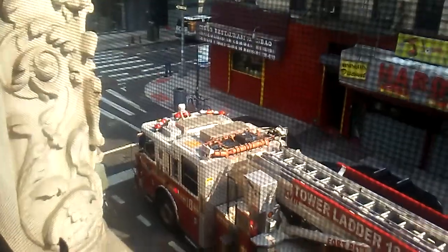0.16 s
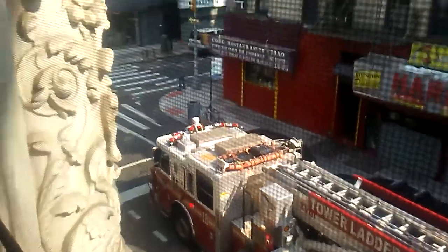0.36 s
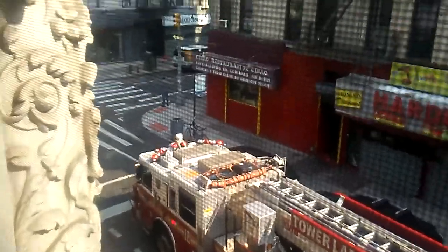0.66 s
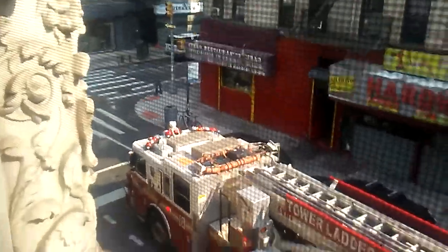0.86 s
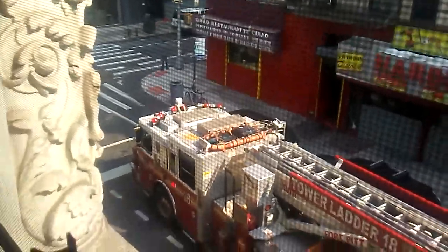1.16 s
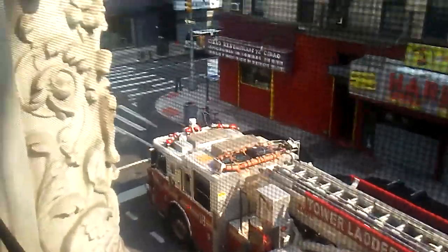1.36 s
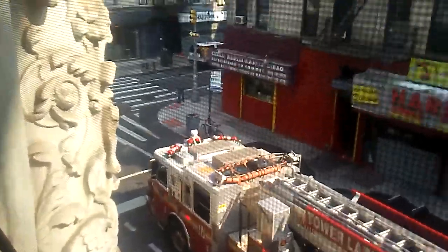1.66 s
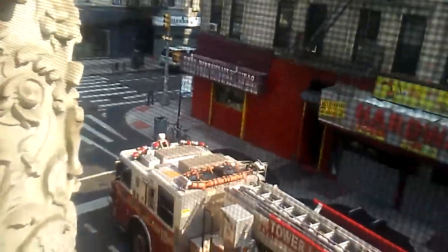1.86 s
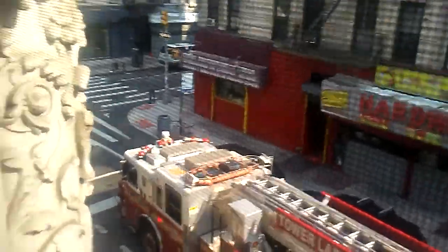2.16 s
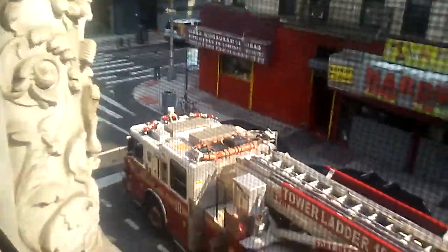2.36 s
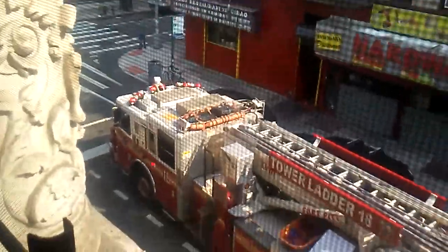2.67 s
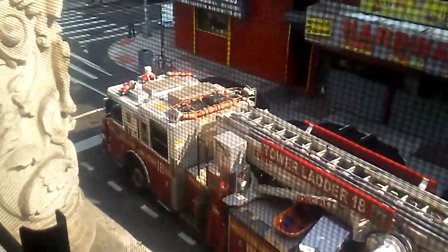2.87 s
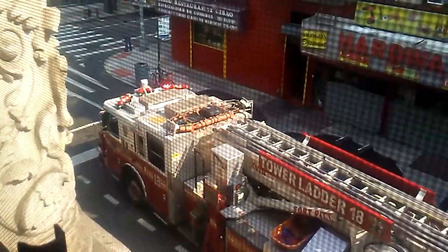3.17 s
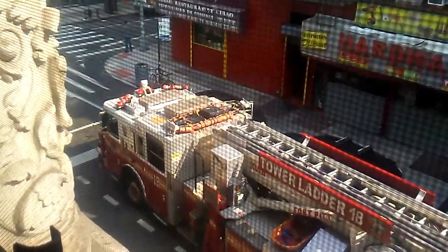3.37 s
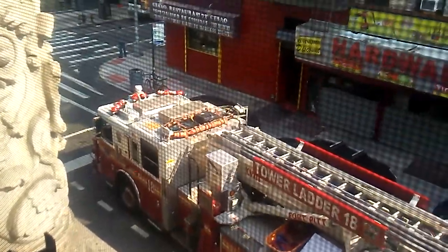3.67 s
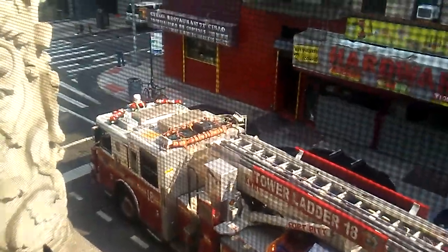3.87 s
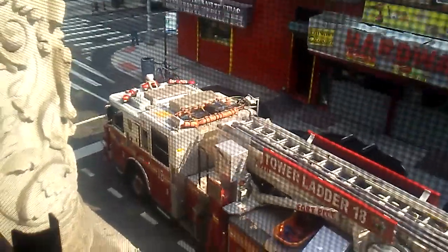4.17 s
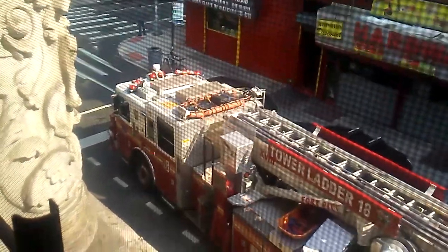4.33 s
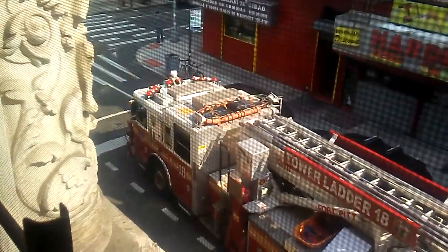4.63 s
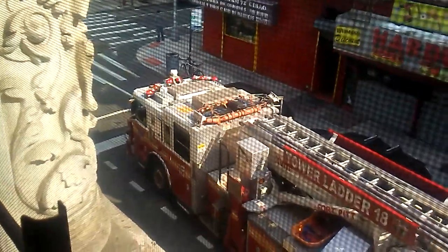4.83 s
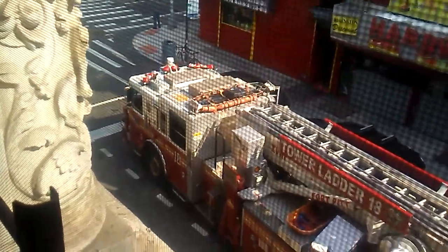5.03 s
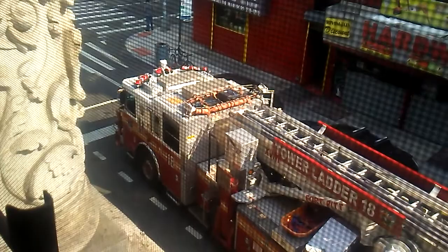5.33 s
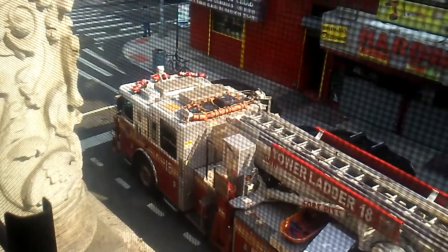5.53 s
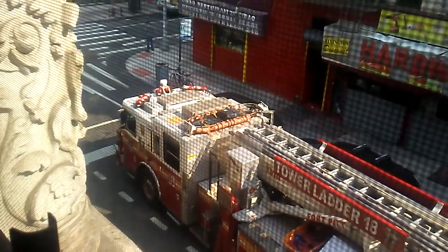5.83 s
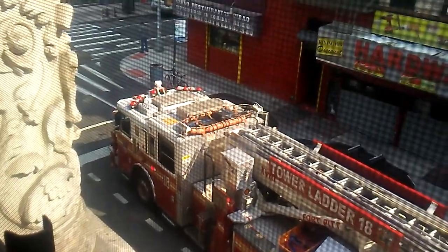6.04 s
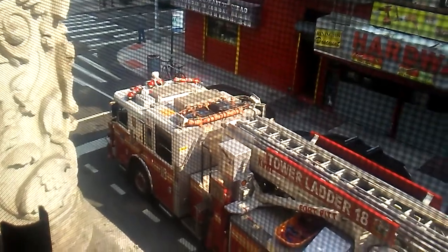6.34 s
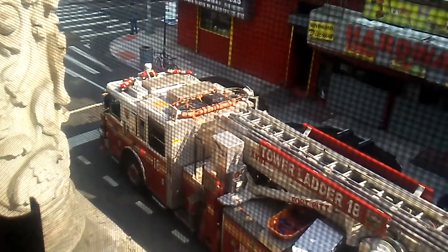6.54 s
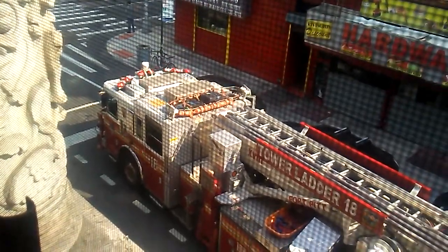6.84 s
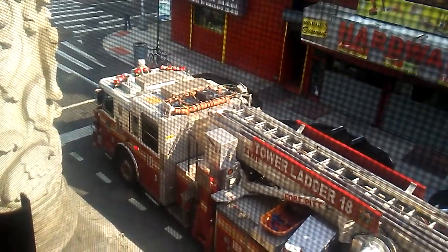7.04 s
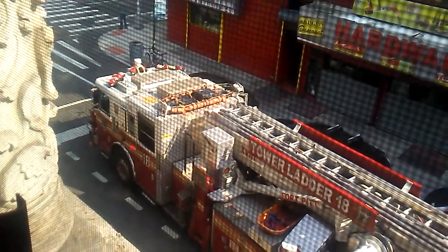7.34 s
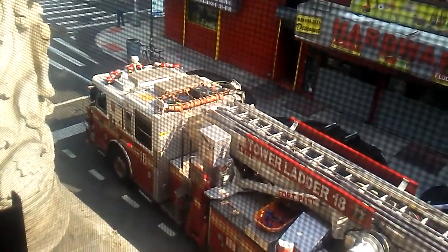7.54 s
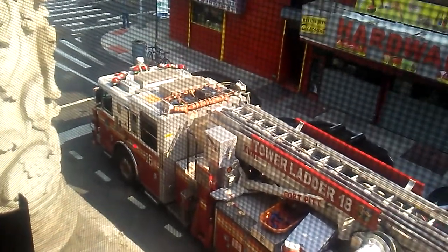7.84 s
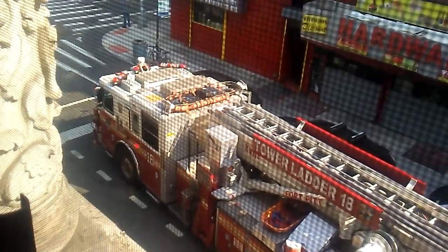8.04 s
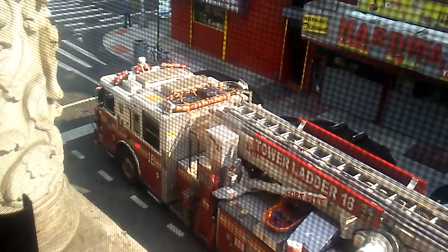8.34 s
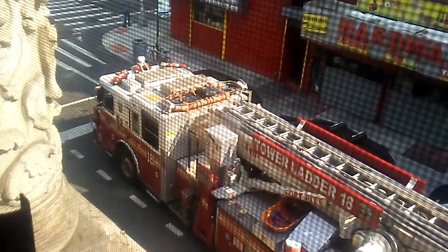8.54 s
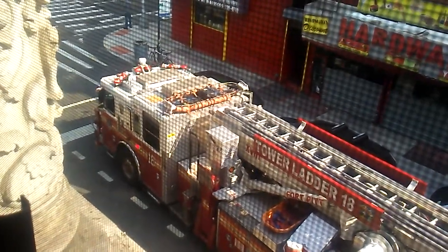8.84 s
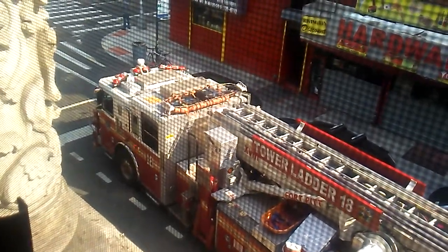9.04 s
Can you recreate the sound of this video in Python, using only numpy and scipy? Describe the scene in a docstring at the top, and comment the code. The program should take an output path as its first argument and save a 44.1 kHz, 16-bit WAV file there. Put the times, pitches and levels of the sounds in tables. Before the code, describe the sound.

Heavy truck engine idling continuously, its hum sagging and recovering slightly, with another engine throbbing and clattering softly behind it. Air valves vent: a tiny clicked puff, then a sudden overpowering rush of bright air that fades over a second or so, later a brief medium hiss and a weak last one. Heard from above through a small single microphone, amid low street rumble and faint reflections from house fronts.

```python
"""A large diesel truck idles in a city street, heard from an upper window through one small microphone.
Its speed sags and recovers, moving a gear hum, the roar and the tick of each firing, all on one crankshaft.
Air valves vent one big blast, three lesser hisses and a short puff, as coloured noise shaped by valve flow.
A second engine idles steadily nearby on multiples of its cycle; low gliding notes swell and go as sines.
House fronts scatter weak echoes, and the microphone is nearly deaf from about 4.4 to 4.8 kHz."""
import sys
import numpy as np
from scipy import signal
from scipy.fft import rfft, irfft, next_fast_len
from scipy.io import wavfile
from scipy.ndimage import uniform_filter1d, map_coordinates

SR = 44100
rng = np.random.default_rng(int(sys.argv[2]) if len(sys.argv) > 2 else 0)


def inscribe(sig):
    """Save sig as 16-bit PCM at rate SR to the path in sys.argv[1].

    A 1-D sig is mono; a 2-D sig holds one channel per row.
    Samples are clipped to [-1, 1] before scaling.
    """
    pcm = np.round(np.clip(np.atleast_2d(sig).T, -1, 1) * 32767)
    wavfile.write(sys.argv[1], SR, pcm.astype(np.int16))


N = 405705
TIME = np.arange(N) / SR  # seconds

# Engine speed of the truck, as the pitch of its gear hum. Each row: time in seconds, pitch in Hz.
GEAR_PITCH = [(0.0, 231.2), (0.5, 236.3), (1.25, 233.9), (2.25, 242.8), (2.8, 237), (3.0, 238.6),
              (3.25, 245.3), (3.85, 257.6), (4.0, 258.8), (4.4, 245.7), (4.8, 238.2), (5.35, 229.6),
              (6.1, 228.8), (6.8, 230.2), (7.4, 236.5), (7.8, 237.2), (8.4, 235.9), (9.2, 236.3)]
GEAR_ORDER = 20.045  # hum turns per crankshaft turn
FIRING_LEAD = 0.17  # head start in firings
# The casing resonance makes the hum loudest near this pitch.
CASING_HZ, CASING_WIDTH_HZ, HUM_DB = 238.5, 10.6, -34.5
# Exhaust note. Each row: multiple of the crankshaft speed, level in dB.
EXHAUST_ORDERS = [(12, -58)]
# A pair of hums that follows the engine speed, lower then upper. Each row: level on joining in dB,
# drift in dB per second.
PAIR_LEVELS = [(-35, 0), (-34, -2.4)]
# Pitch of the lower and the upper of the pair, as multiples of the gear hum.
PAIR_PITCHES = 1.0415, 1.156
PAIR_JOINS_S, PAIR_RISE_S = 5.65, 0.35


def truck_hums(gear, gear_hz, crank):
    """Gear teeth hum through a resonant casing, with an exhaust note and a later pair of hums."""
    resonance = 1 / (1 + ((gear_hz - CASING_HZ) / CASING_WIDTH_HZ) ** 2) ** 1.4
    hums = amp(HUM_DB) * resonance * tone(gear, waver_db=0.55)
    for order, db in EXHAUST_ORDERS:
        hums += amp(db) * tone(order * crank, waver_db=4.5)
    since = np.maximum(TIME - PAIR_JOINS_S, 0)
    joining = np.minimum(since / PAIR_RISE_S, 1)
    for ratio, (db, drift) in zip(PAIR_PITCHES, PAIR_LEVELS):
        hums += joining * amp(db + drift * since) * tone(ratio * gear, waver_db=1.8)
    return hums


# Engine block, fan and street. Each row: time in seconds, level in dB, extra brightness in dB.
ROAR_LEVEL = [(0, -24, .5), (1.92, -23.5, -1.5), (2.36, -25, .5), (3, -22, -0.5), (3.6, -24.5, 0.5),
              (7.15, -25, -1.5), (7.71, -24.5, -1.5), (9.2, -24.5, -2)]
# Spectrum of the roar, also used for the second engine's clatter. Each row: frequency in Hz, relative dB.
ROAR_SPECTRUM = [(160, -33), (280, -7), (350, -5.5), (470, -4), (670, -3.5), (890, -1), (1130, -5.5),
                 (1900, -5.5), (2850, -6), (3050, -11), (3600, -9.5), (4000, -13.5), (5500, -23),
                 (7000, -70)]
# Ringing bodywork, in the same two sounds. Each row: frequency in Hz, width in Hz, gain in dB.
BODY_PANELS = [(590, 21, 3.5), (630, 25, -1), (772, 62, 3), (889, 50, 3), (1044, 48, 2), (1230, 43, 2),
               (1544, 47, 3.5), (1733, 87, 5), (2260, 78, 3), (2605, 33, 3.5), (2770, 46, 4), (2954, 50, 4),
               (3730, 53, 1)]


def truck_roar(firing):
    """Broad noise rings the bodywork, swells gently with each firing and echoes off the house fronts."""
    level_db, bright_db = curves(ROAR_LEVEL)
    roar = unit(beats(firing, depth=0.12, sharp=5.9) * noise(ROAR_SPECTRUM, 0.28, BODY_PANELS))
    treble = filtered(roar, lambda hz: np.clip((hz - 1800) / 1500, 0, 1))
    roar = roar + (amp(bright_db) - 1) * treble
    return amp(level_db) * street(roar)


# Valve-gear tick. Each row: time in seconds, level in dB before dips and flutter.
TICK_LEVEL = [(0, -38.5), (.9, -38.5), (1.2, -39), (1.75, -38), (2.1, -40.5), (2.55, -38), (4.4, -45.5),
              (5.3, -45), (6.3, -43.5), (6.6, -49), (7.25, -45), (8.4, -48), (9.2, -47)]
# Spectrum of the tick. Each row: frequency in Hz, relative dB.
TICK_SPECTRUM = [(3500, -42), (4700, -3), (6370, 1), (7090, 1), (8680, -6.5), (10000, -17), (11000, -25),
                 (12000, -28), (13100, -30), (14400, -28), (15200, -37), (16500, -46)]
# Brief dips in the treble level, each ending in a quick return. Each row: start of the return in seconds,
# depth in dB.
TREBLE_DIPS = [(1.16, -2), (1.44, -2), (4.44, -9), (4.61, -3.5), (4.89, -8), (5.13, -3.5), (6.22, -6),
               (6.82, -2), (6.99, -1), (8.66, -3), (8.93, -2), (9.17, -3)]
DIP_LEAD_S, RETURN_S, TICK_FLUTTER_DB = 0.11, 0.022, 0.86
# Small steel parts. Each row: frequency in Hz, width in Hz, level in dB before their common fade.
STEEL_RINGS = [(8440, 60, -65), (10490, 70, -73), (11600, 90, -76), (12430, 80, -80)]
RING_DB, RING_DRIFT = 2.5, -0.9  # common offset in dB at the start, drift in dB per second


def truck_tick(firing):
    """Each firing sounds a bright valve-gear tick and rings a few small steel parts."""
    dips_db = sum(np.interp(TIME - s, [-DIP_LEAD_S, -RETURN_S, 0, RETURN_S], [0, depth, depth, 0])
                  for s, depth in TREBLE_DIPS)
    level_db, = curves(TICK_LEVEL)
    steel = amp(level_db + dips_db + TICK_FLUTTER_DB * wobble(9)) * noise(TICK_SPECTRUM, 1.3)

    def bells(hz):
        # scaled so that each narrow band has its listed rms level
        return sum(amp(db) * np.sqrt(SR / np.sqrt(np.pi) / width) * np.exp(-2 * ((hz - centre) / width) ** 2)
                   for centre, width, db in STEEL_RINGS)

    # the rings come and go together
    fade = amp(RING_DB + RING_DRIFT * TIME + dips_db + 3.5 * wobble(4))
    steel = steel + fade * filtered(rng.standard_normal(N), bells)
    return unit(beats(firing, depth=0.36, sharp=5.6)) * steel


def truck():
    """Six cylinders fire three times per crankshaft turn; hums, roar and tick are tied to that shaft."""
    gear_hz, = curves(GEAR_PITCH)
    gear = np.cumsum(gear_hz) / SR
    crank = gear / GEAR_ORDER
    firing = 3 * crank + FIRING_LEAD
    return truck_hums(gear, gear_hz, crank) + truck_roar(firing) + truck_tick(firing)


# Air releases; a release with several stages takes several rows, and the big blast has a leak, a burst and
# a duller plateau. Each row: opening in seconds, rise in seconds, time held open in seconds,
# jet level in dB at the end of the rise, drift while open in dB per second,
# initial fall after closing in dB per second, thin top level in dB, chest level in dB.
AIR_RELEASES = [(.535, 0.028, 0.28, -41.5, -8, -45, -43, -54), (1.785, 0.015, .04, -36, -40, -80, -55, -31),
                (2.577, 0.011, 0.081, -43, -10, -200, -48, -47),
                (2.712, .05, 0.6, -10.5, -6.5, -22, -15.5, -16.5),
                (3.3, 0.29, 0.26, -19, -1.5, -40, -33, -28.5), (5.44, 0.058, 0.11, -33, 30, -200, -42, -48),
                (5.54, 0.045, 0.13, -23.5, -19, -84, -34.5, -26.5),
                (7.42, 0.063, 0.23, -39.5, 22, -25, -45, -38), (7.7, .1, .36, -37, -4, -77, -42, -37)]
THIN_SLOPE, CHEST_SLOPE = 1.21, 1.1  # dB that these bands move for each dB of the jet
# Spectrum of the jet. Each row: frequency in Hz, relative dB.
JET_SPECTRUM = [(3800, -40), (4700, 2), (5800, 2), (6800, 2), (7500, 2.5), (8500, 2), (9500, -5),
                (10800, -20), (14000, -33), (22000, -120)]
# Spectrum of the thin top. Each row: frequency in Hz, relative dB.
THIN_SPECTRUM = [(6000, -19), (10200, 4), (11900, -2), (14500, 5), (15000, -2), (15800, -0.5)]
# Spectrum of the chest. Each row: frequency in Hz, relative dB.
CHEST_SPECTRUM = [(160, -38), (280, -7.5), (450, -3), (600, -1.5), (720, -6), (900, -3), (1400, -0.5),
                  (2400, -2.5), (3000, 1.5), (3800, 3.5), (4700, -4), (5500, -38)]
# Exhaust port resonance in the chest. Each row: frequency in Hz, width in Hz, gain in dB.
PORT_RESONANCE = [(597, 51, 4)]
# A faint narrow-band sizzle swells and fades around 1.4 s. The one row: start in seconds, rise in seconds,
# hold in seconds (negative: the fall cuts in early), level in dB, drift (with a negative hold, a fixed
# offset), initial fall in dB per second.
SIZZLE = (1.2, 0.6, -0.4, -52, -14, -70)
# Spectrum of the sizzle. Each row: frequency in Hz, relative dB.
SIZZLE_SPECTRUM = [(12500, -40), (13500, -10), (13900, 0), (14300, -4), (14900, -1), (15700, -10)]


def vents():
    """Escaping air: a jet band, a thin top from small openings, and a chest; the last two move more steeply."""
    jet_air = noise(JET_SPECTRUM, 1.0)
    thin_air = noise(THIN_SPECTRUM, 0.95)
    chest_air = noise(CHEST_SPECTRUM, 1.0, PORT_RESONANCE)
    bands = np.array([jet_air, thin_air, chest_air])
    slopes = np.array([[1], [THIN_SLOPE], [CHEST_SLOPE]])
    power = np.zeros((3, N))
    for s, rise, held, jet, drift, fall, thin, chest in AIR_RELEASES:
        levels_db = np.array([[jet], [thin], [chest]])
        power += amp(levels_db + slopes * valve(s, rise, held, drift, fall)) ** 2
    air = np.sum(np.sqrt(power) * bands, axis=0)
    s, rise, held, db, drift, fall = SIZZLE
    air += amp(db + valve(s, rise, held, drift, fall)) * noise(SIZZLE_SPECTRUM, 0.8)
    turbulence = amp(0.48 * wobble(25))
    return air * turbulence


RISE_FROM_DB, FALL_QUICKENS = -24, 1.1  # level at the opening; the fall steepens by this share per second


def valve(opens, rise, held, drift, fall):
    """Flow in dB: a rise to 0, a drift while the valve is open, a fall as the line empties."""
    t = TIME - opens - rise
    after = np.maximum(t - held, 0)
    rising = RISE_FROM_DB * np.minimum(t / rise, 0) ** 2
    falling = fall * after * (1 + FALL_QUICKENS * after)
    return rising + drift * np.clip(t, 0, held) + falling


# A short bright click as a valve opens. Each row: start in seconds, starting level in dB before the
# treble filter.
VALVE_CLICKS = [(1.797, -43)]


def clicks():
    """A bright crack of a few milliseconds: noise dying away, with only its treble kept."""
    out = np.zeros(N)
    t = np.arange(SR // 50) / SR
    for s, db in VALVE_CLICKS:
        out[round(s * SR):][:len(t)] += amp(db - 60 * t / 0.03) * rng.standard_normal(len(t))
    return filtered(out, lambda hz: np.clip((hz - 5500) / 4000, 0, 1))


# Second engine, nearby. Each row: time in seconds, main throb in dB, upper throb in dB.
STEADY_LEVEL = [(0, -54, -55), (1, -48.5, -55), (2.4, -50, -55), (2.8, -53.5, -54), (3.6, -46, -62),
                (4, -57, -61), (4.4, -49, -57), (5.2, -54.5, -66), (6.4, -57, -61), (6.8, -51.5, -63),
                (7.5, -56, -48), (8, -48.5, -49), (9.2, -52, -49)]
STEADY_CYCLE_HZ = 5.846
# Notes of the main throb. Each row: multiple of the cycle, dB relative to the throb.
MAIN_ORDERS = [(9, -14), (12, 1), (18, -12), (37, 1.5)]
# Notes of the upper throb. Each row: multiple of the cycle, dB relative to the throb.
UPPER_ORDERS = [(13, -2), (14, -1.5)]
# Spectrum of the street rumble. Each row: frequency in Hz, relative dB.
RUMBLE_SPECTRUM = [(25, -46), (45, -41), (60, -28), (95, -17), (122, -36), (150, -16.5), (200, -10),
                   (280, -6), (330, -38), (400, -67)]


def neighbour():
    """A steady engine throbs on low multiples of its cycle and clatters, over street rumble."""
    main_db, upper_db = curves(STEADY_LEVEL)
    cycle = STEADY_CYCLE_HZ * TIME
    main = sum(amp(db) * tone(k * cycle, waver_db=0.3) for k, db in MAIN_ORDERS)
    upper = sum(amp(db) * tone(k * cycle, waver_db=3.5) for k, db in UPPER_ORDERS)
    # the same knocks return every cycle, very slightly early or late
    pattern = rng.standard_normal(round(SR / STEADY_CYCLE_HZ))
    place = (cycle + 0.00059 * wobble(1.522)) % 1
    knocks = map_coordinates(pattern, [place * len(pattern)], mode="wrap")
    clatter = amp(-33.5) * coloured(knocks, ROAR_SPECTRUM, BODY_PANELS)
    rumble = amp(-39.5) * noise(RUMBLE_SPECTRUM, 0.85)
    return clatter + amp(main_db) * main + amp(upper_db) * upper + rumble


# Low notes that swell and go. Each row: start in seconds, length in seconds, starting pitch in Hz,
# glide in Hz per second, peak level in dB.
LOW_NOTES = [(3.2, .95, 271, 9, -46), (5.1, 2.2, 172, .3, -53), (7, 1.05, 75, 6.5, -48),
             (7.6, 2, 147.5, 2.2, -50)]


def drones():
    """Low notes that swell and go, each a gliding sine under one soft arch."""
    out = np.zeros(N)
    for s, length, hz, glide, db in LOW_NOTES:
        t = np.clip(TIME - s, 0, length)
        arch = np.sqrt(np.abs(np.sin(np.pi * t / length)))
        out += arch * amp(db) * tone(np.cumsum(hz + glide * t) / SR, waver_db=0.0)
    return out


def street(x):
    """House fronts return 40 weak scattered echoes within a tenth of a second, later ones weaker."""
    echoes = np.zeros(SR // 10)
    lag, size = rng.random((2, 40))
    echoes[(lag * len(echoes)).astype(int)] = amp(-21 - 8.4 * lag) * np.sign(size - 0.5)
    echoes[0] = 1  # direct sound
    return signal.fftconvolve(x, echoes / np.linalg.norm(echoes))[:N]


def tone(turns, waver_db):
    """A sine of rms about 1 on a running count of turns, slightly unsteady in level if waver_db is set."""
    return np.sqrt(2) * amp(waver_db * wobble(6)) * np.sin(2 * np.pi * (turns + rng.random()))


def beats(turns, depth, sharp):
    """One swell per turn, sudden rise and slower fall, each at its own strength."""
    whole, part = np.divmod(turns, 1)
    strengths = amp(0.84 * rng.standard_normal(int(whole.max()) + 1))
    swell = unit(part * np.exp(-sharp * part))
    return 1 - depth + depth * strengths[whole.astype(int)] * swell


def noise(points, patchy_db=0, peaks=()):
    """Coloured noise with patches of random gain in time and frequency."""
    z = signal.stft(rng.standard_normal(N), nperseg=512)[2]
    field = uniform_filter1d(rng.standard_normal(z.shape), size=6, axis=0)
    field = uniform_filter1d(field, size=10, axis=1)
    patchy = signal.istft(z * amp(patchy_db * unit(field)), nperseg=512)[1][:N]
    return coloured(patchy, points, peaks)


def coloured(x, points, peaks=()):
    """x at rms 1, coloured by (Hz, dB) points and resonant (Hz, width Hz, dB) peaks."""
    f, db = np.transpose(points)

    def response(hz):
        lift = sum(gain / (1 + (2 * (hz - centre) / width) ** 2) for centre, width, gain in peaks)
        return amp(np.interp(np.log(hz + 1), np.log(f), db) + lift)

    return unit(filtered(x, response))


def filtered(x, response):
    """x times a response of frequency, with padding against wrap-around."""
    m = next_fast_len(N + SR // 2)
    return irfft(rfft(x, m) * response(np.fft.rfftfreq(m, 1 / SR)), m)[..., :N]


def wobble(rate):
    """A smooth random curve, rate knots a second."""
    return map_coordinates(rng.standard_normal(int(N * rate / SR) + 4), [TIME * rate])


def curves(rows):
    """One value per sample for each column after the time."""
    s, *cols = np.transpose(rows)
    return [np.interp(TIME, s, c) for c in cols]


def amp(db):
    """Decibels to amplitude factor."""
    return np.exp(np.asarray(db) * np.log(10) / 20)


def unit(x):
    """x scaled to rms 1."""
    return x / np.sqrt(np.mean(x ** 2) + 1e-20)


def scene():
    """The street as it reaches the window, the same in both channels."""
    air = street(vents() + clicks())
    return np.tile(truck() + air + neighbour() + drones(), (2, 1))


# The deaf band of the microphone. Each row: frequency in Hz, gain in dB.
MICROPHONE_RESPONSE = [(4020, 0), (4070, -7), (4270, -12), (4330, -22), (4450, -53), (4750, -45),
                       (5050, -29), (5300, -22), (5760, -9.5), (6400, -1.5), (6800, 1.5)]
TOP_HZ = 15790  # middle of the 160 Hz wide upper band edge


def record(dry):
    """The microphone has a deaf band; peaks beyond 0.9 then clip and nothing is kept above the band limit."""
    f, db = np.transpose(MICROPHONE_RESPONSE)
    heard = filtered(dry[0], lambda hz: amp(np.interp(hz, f, db)))
    clipped = np.clip(heard, -0.9, 0.9)
    edge = lambda hz: np.sin(np.pi / 2 * np.clip((TOP_HZ - hz) / 160 + 0.5, 0, 1)) ** 2
    return np.tile(filtered(clipped, edge), (2, 1))


dry = scene()
out = record(dry)
inscribe(out)
```